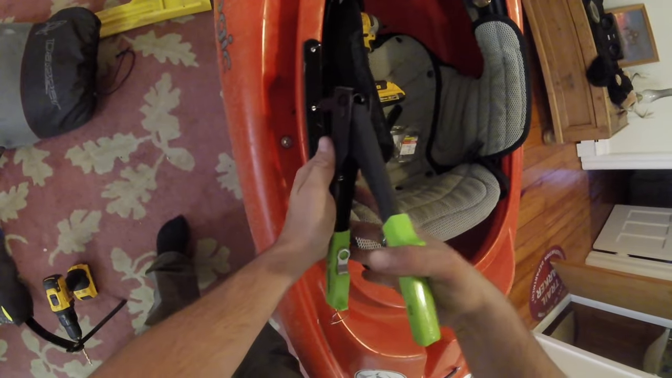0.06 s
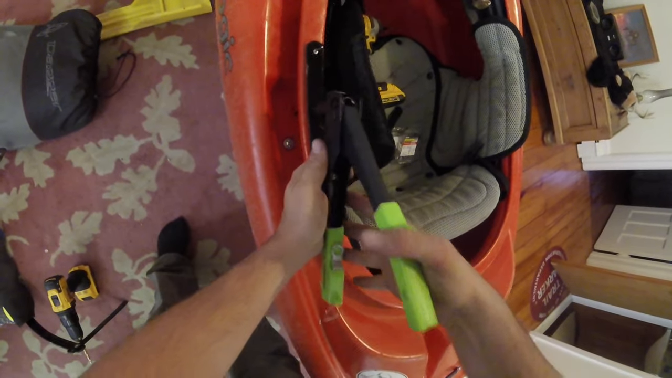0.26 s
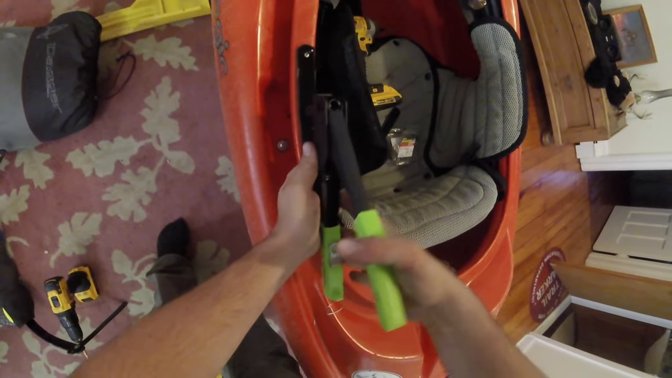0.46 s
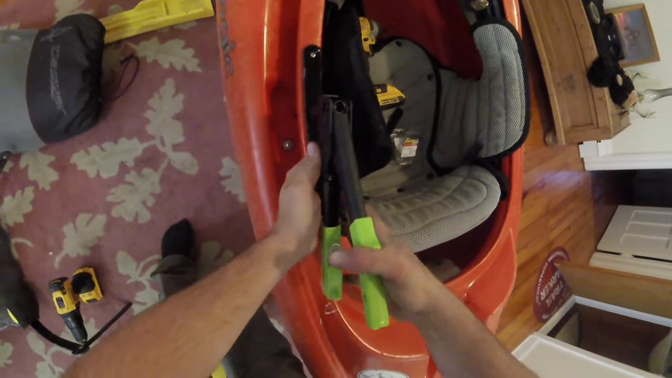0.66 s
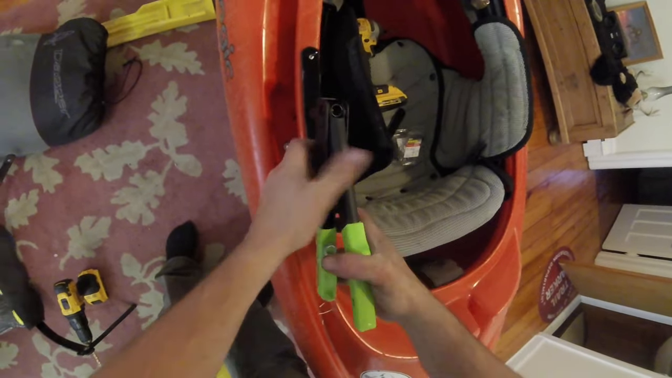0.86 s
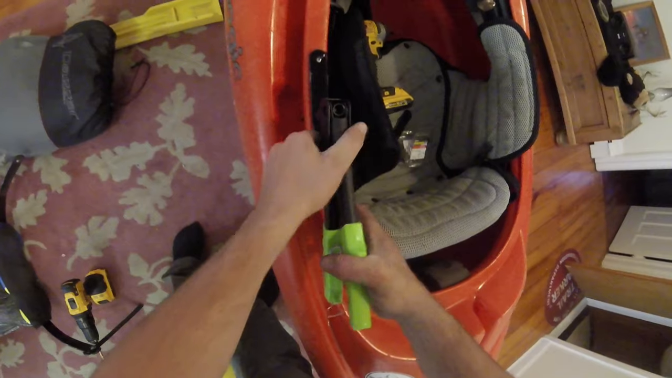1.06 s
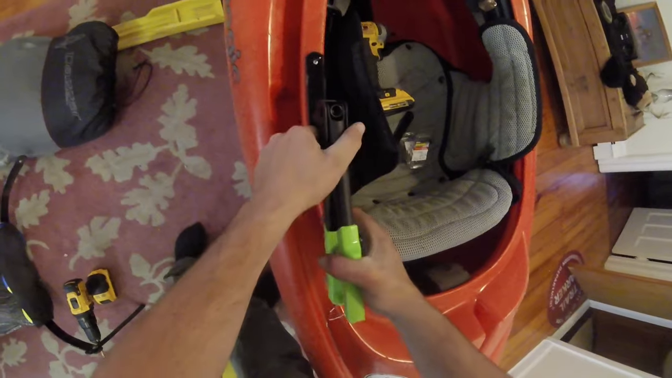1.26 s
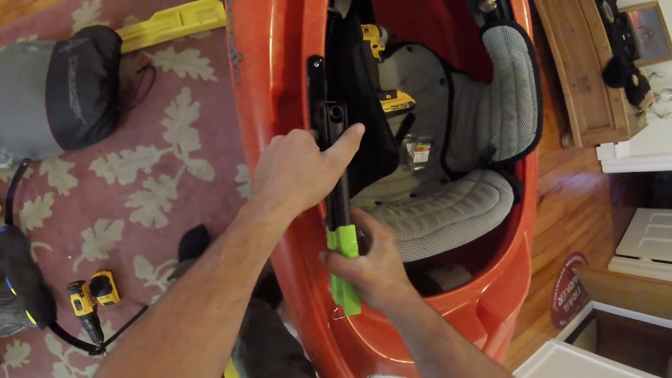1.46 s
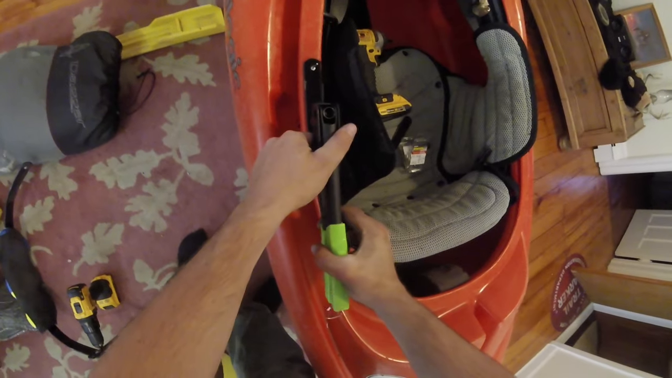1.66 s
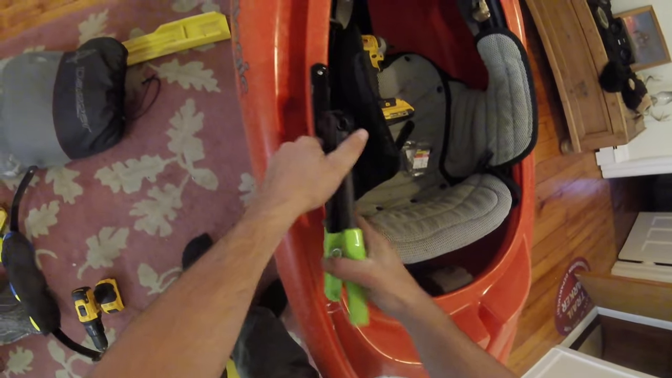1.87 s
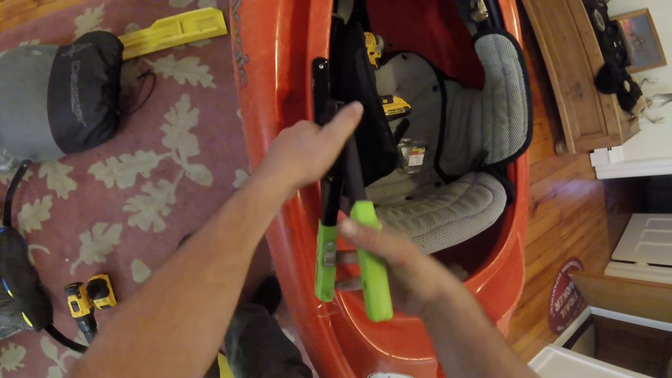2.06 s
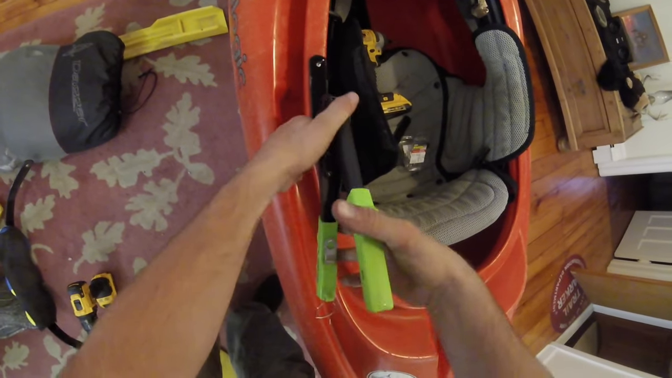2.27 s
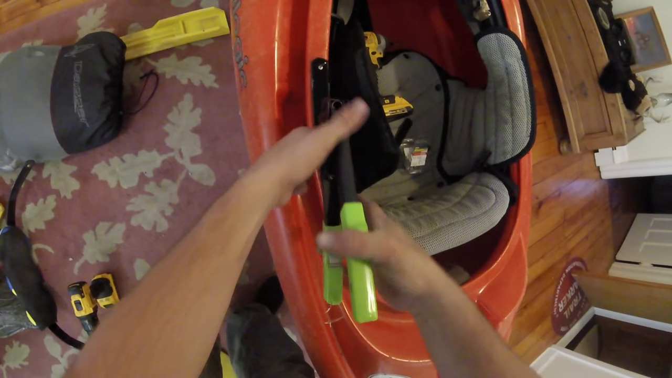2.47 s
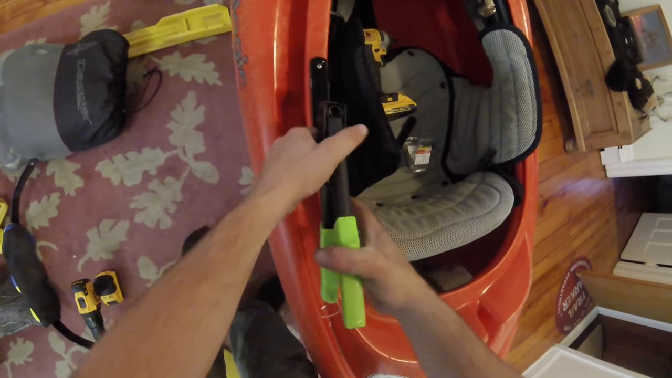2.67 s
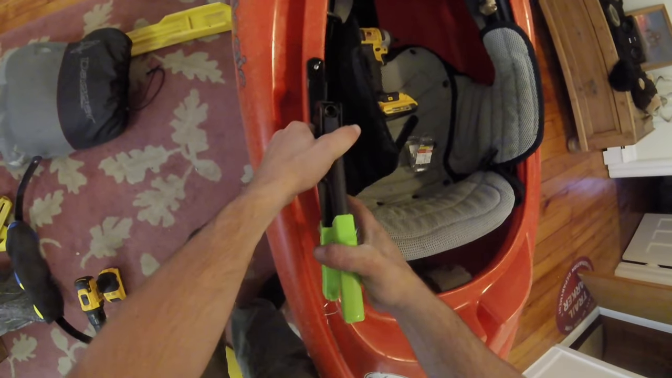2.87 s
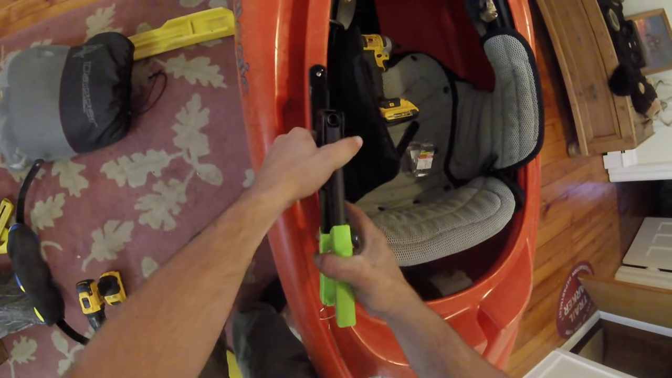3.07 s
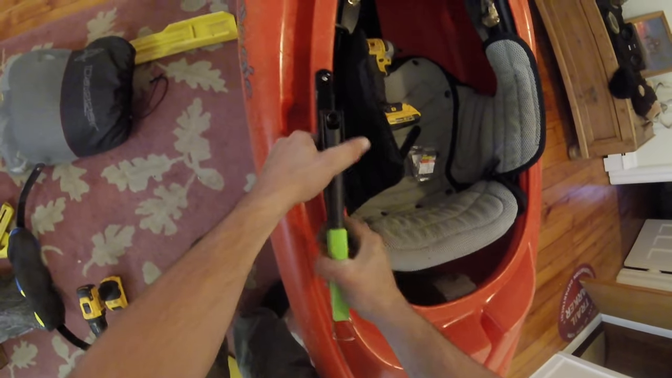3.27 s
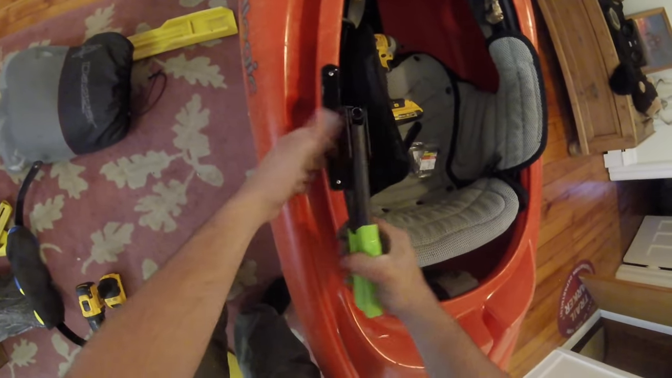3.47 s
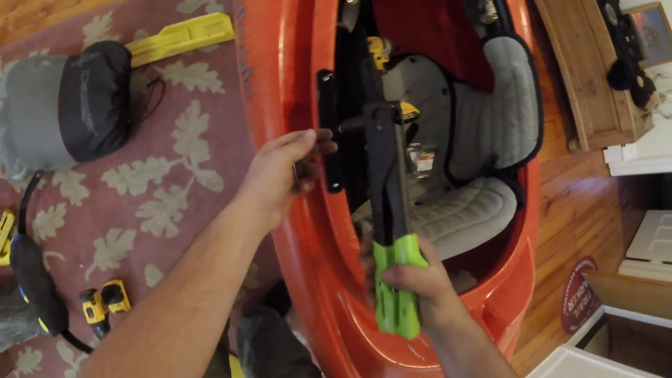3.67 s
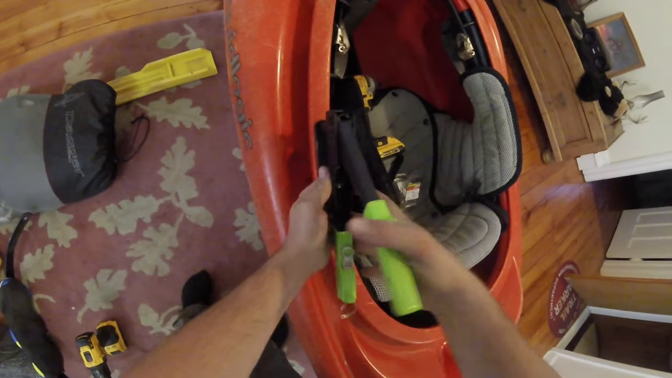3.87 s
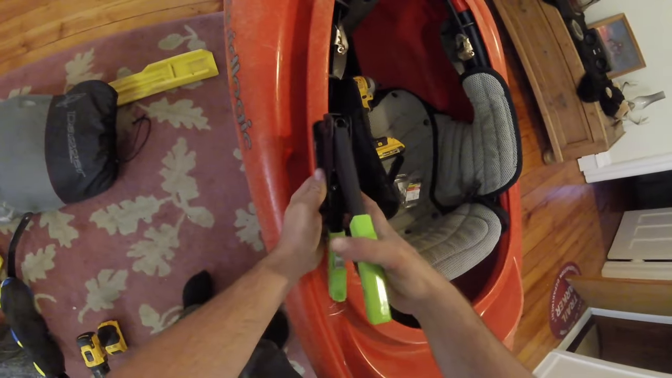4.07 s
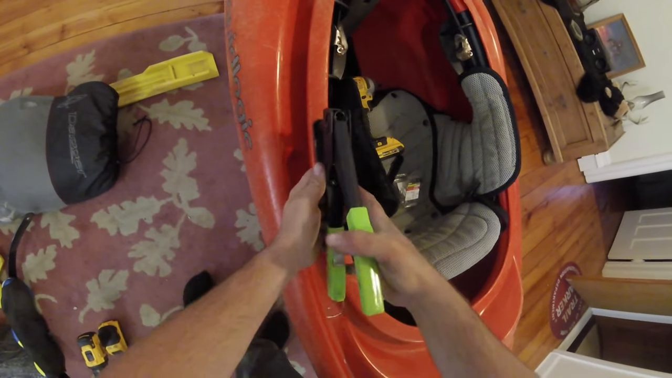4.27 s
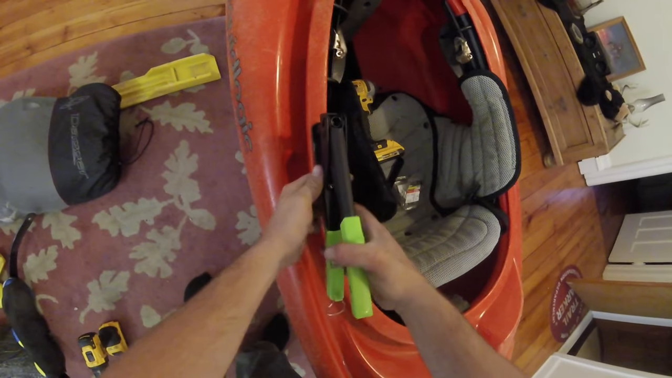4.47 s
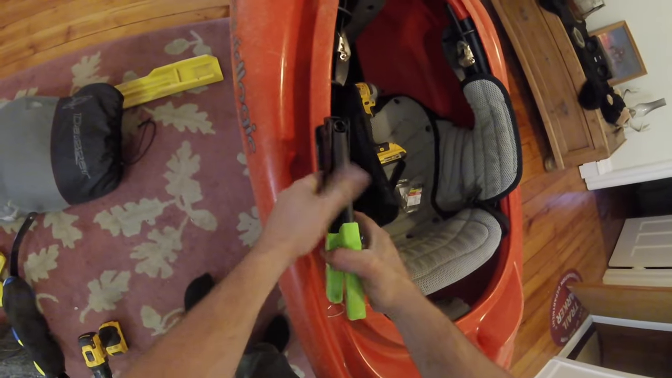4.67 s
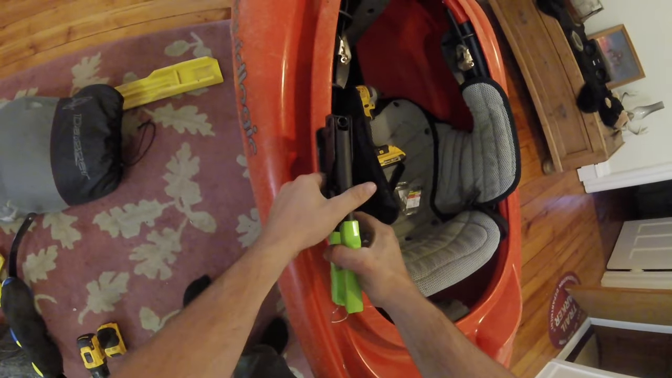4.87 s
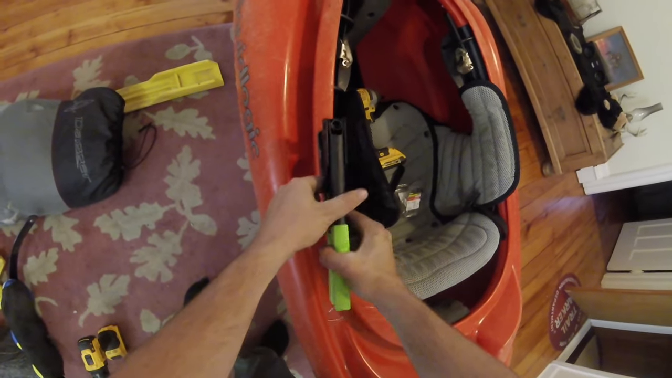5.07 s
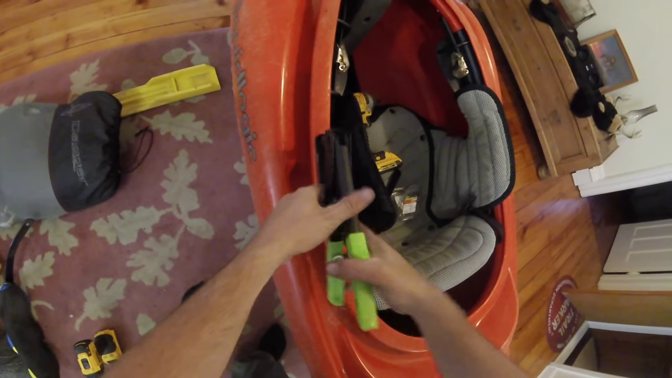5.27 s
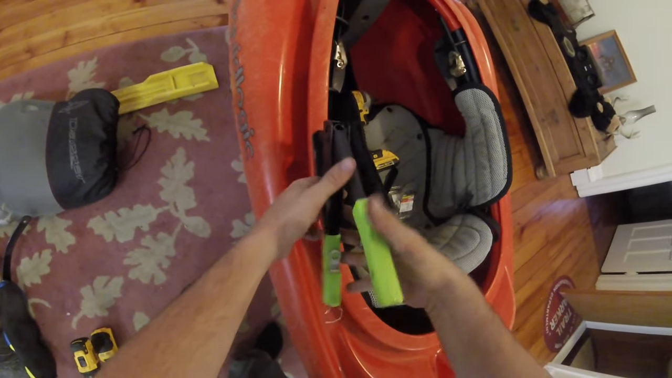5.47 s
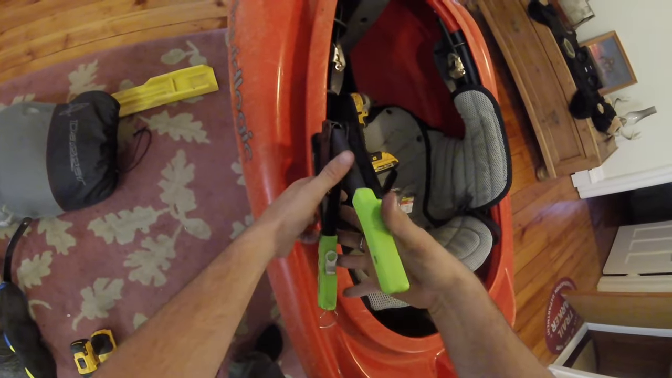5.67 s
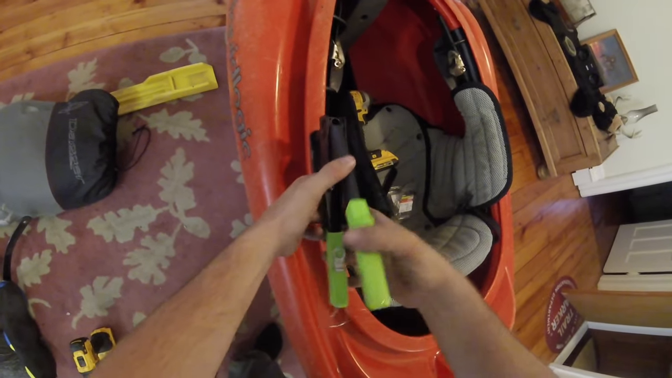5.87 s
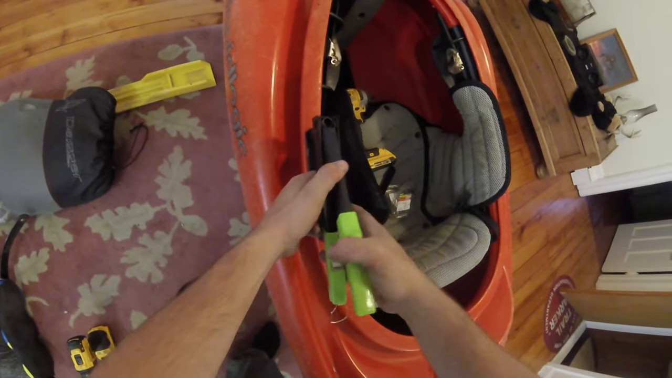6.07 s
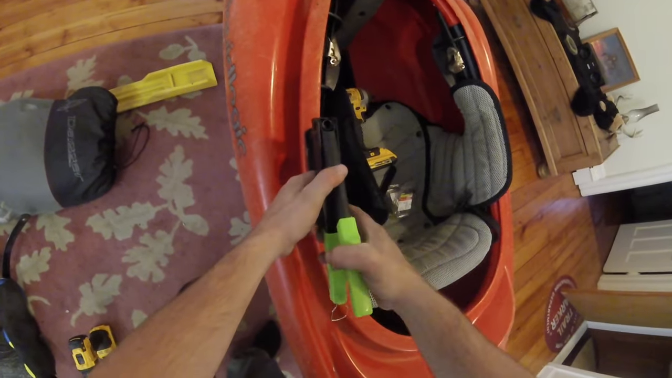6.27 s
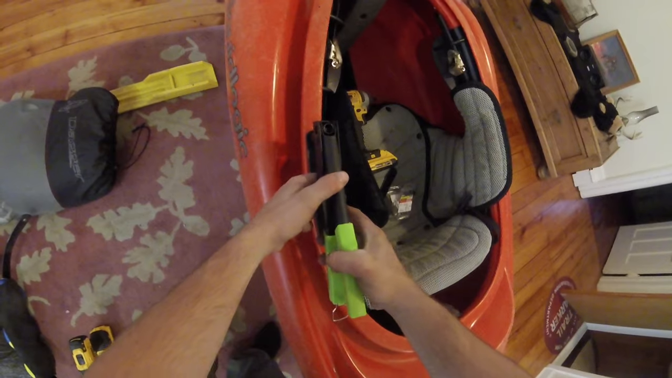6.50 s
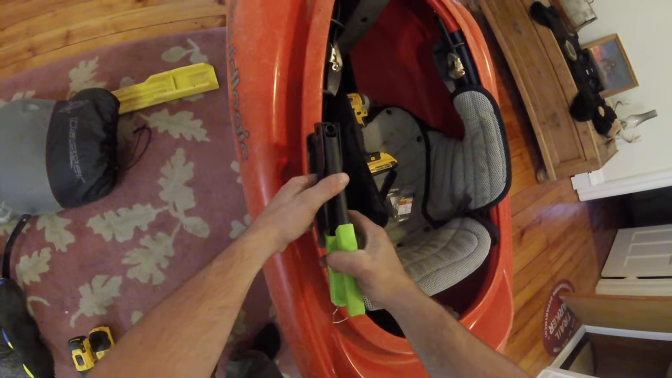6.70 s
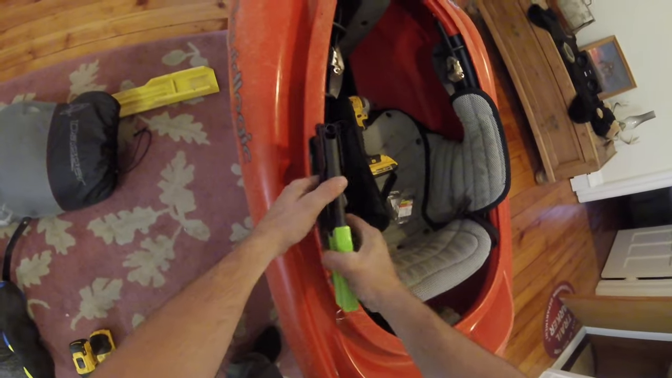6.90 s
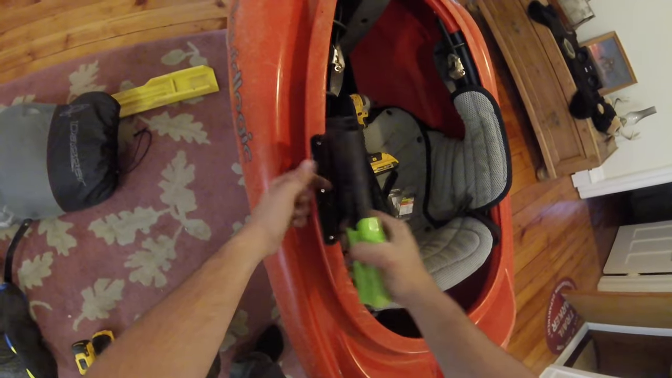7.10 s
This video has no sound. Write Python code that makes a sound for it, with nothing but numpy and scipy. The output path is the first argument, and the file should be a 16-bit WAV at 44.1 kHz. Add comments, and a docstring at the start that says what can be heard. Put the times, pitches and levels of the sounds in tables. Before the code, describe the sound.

A hand riveter clacks and thuds against a hollow plastic kayak hull, with two violent metallic snaps among quiet handling and low rumble.

```python
"""Hand riveter on a plastic kayak

A hand riveter is pumped against the hull of a plastic kayak in a carpeted room: handles and jaws clack
as filtered bursts and ringing modes, and the hollow hull booms as a bank of low modes under each contact.
Twice the steel mandrel breaks with a sharp snap: cracks, ringing jaws and a wash of diffuse echoes.
Shaped noise makes the head-worn camera's rumble and hiss; its limiter ducks everything around the snaps."""
import sys
import numpy as np
from scipy import signal
from scipy.fft import rfft, irfft
from scipy.io import wavfile
from scipy.ndimage import uniform_filter1d, minimum_filter1d

SR = 44100
rng = np.random.default_rng(int(sys.argv[2]) if len(sys.argv) > 2 else 0)


def digitize_waveform(pressure):
    """Quantize a signal to 16-bit integers and store it at the path in sys.argv[1].

    Rows of a 2-D input are taken as channels; values are limited to [-1, 1].
    """
    field = np.atleast_2d(pressure).T
    bounded = np.clip(field, -1, 1)
    quanta = np.round(bounded * 32767).astype(np.int16)
    wavfile.write(sys.argv[1], SR, quanta)


N = 314874
TIME = np.arange(N) / SR
HALF_SECOND = TIME[:SR // 2]
ROOM_T60_S, FIRST_ECHO_S = 0.4, 0.0032

# The mandrel breaks. Each row: moment in seconds, level in dB, delay of the jaws' recoil in seconds,
# recoil in dB relative to the break, pitch ratio of the jaws, force of the recoil on the hull in dB.
MANDREL_BREAKS = [(3.2198, -1.1, .0075, -4.5, .965, -6), (6.858, -1, .005, -8.5, 1.024, -7)]


def from_db(db):
    """Turn decibels into an amplitude factor."""
    return 10 ** (np.asarray(db) / 20)


def rms_one(x):
    """Scale a steady sound to rms 1."""
    return x / np.sqrt(np.mean(x ** 2) + 1e-20)


def loudest_one(x):
    """Scale a blow so that its loudest hundredth of a second has rms 1."""
    power = uniform_filter1d(x ** 2, SR // 100, mode="constant")
    return x / np.sqrt(power.max())


def level(curve):
    """Gain in time from rows of seconds and dB."""
    return from_db(np.interp(TIME, *np.transpose(curve)))


def at_hz(points, hz):
    """Read a spectrum on a log-frequency axis; above its last point it falls 10 dB per octave."""
    known_hz, db = np.transpose(points)
    octaves_beyond = np.log2(np.maximum(hz / known_hz[-1], 1))
    return np.interp(np.log(hz + 1e-9), np.log(known_hz), db) - 10 * octaves_beyond


def colour(x, spectrum):
    """Causal (minimum-phase) filter with the given spectrum, made by folding its cepstrum."""
    size = min(len(x), SR // 2) // 2 * 2
    hz = np.linspace(0, SR / 2, size // 2 + 1)
    cepstrum = irfft(np.log(from_db(at_hz(spectrum, hz))))
    cepstrum[1:size // 2] *= 2
    response = irfft(np.exp(rfft(cepstrum[:size // 2], size)))
    return signal.oaconvolve(x, response[:size // 2])[:len(x)]


def noise(spectrum):
    """Coloured noise of rms 1."""
    return rms_one(colour(rng.standard_normal(N), spectrum))


def fade(t, t60):
    """Exponential decay that loses 60 dB in t60 seconds."""
    return np.exp(-np.log(1000) * t / t60)


def ring(t, hz, db, t60):
    """One struck mode: a sine that dies away."""
    return from_db(db) * np.sin(2 * np.pi * hz * t) * fade(t, t60)


def add(track, s, sound):
    """Mix a sound into a track at s seconds."""
    start = round(s * SR)
    track[start:start + len(sound)] += sound[:N - start]


def struck(modes, spread_db, swell_s):
    """A body takes a moment to swell, and each blow weights its modes anew."""
    t = HALF_SECOND
    sound = np.zeros(len(t))
    for k, (hz, db, t60) in enumerate(modes):
        weight_db = db + spread_db * rng.standard_normal()
        sound += (-1) ** k * ring(t, hz, weight_db, t60)  # neighbours swing in opposite phase
    return loudest_one(sound * (1 - np.exp(-t / swell_s)))


def diffuse(t60):
    """Countless reflections that set in after the first echo and die away; unit energy."""
    t = HALF_SECOND
    onset = np.clip(t / FIRST_ECHO_S - 1, 0, 1)
    tail = rng.standard_normal(len(t)) * fade(t, t60) * onset
    return tail / np.linalg.norm(tail)


def impact(t60):
    """A short, nearly colourless excitation of unit energy."""
    t = HALF_SECOND
    grains = rfft(rng.standard_normal(len(t)) * fade(t, t60))
    flat = irfft(grains / np.abs(grains), len(t))  # keep the phases, level the spectrum
    even = flat * np.minimum(1, 2 * fade(t, t60))
    return even / np.linalg.norm(even)


def blow(spectrum, t60, room_db):
    """A blow on a part with many dense, quickly dying modes, and the room's smooth answer."""
    direct_and_room = impact(t60) + from_db(room_db) * diffuse(ROOM_T60_S)
    return loudest_one(colour(direct_and_room, spectrum))


def camera():
    """The head-worn camera: low noise rumbles with a changing level over a steady coloured hiss."""
    # Each row: time in seconds, rumble level in dB.
    rumbling = [(0, -49), (3.1, -48), (3.8, -47), (3.95, -35.5), (4.7, -43), (5.2, -37.5), (6.2, -39.5),
                (7.14, -42.5)]
    # Spectrum shapes. Each row: frequency in Hz, relative level in dB per Hz.
    rumble_spectrum = [(12, -6), (22, -2), (32, 0.5), (45, -7), (62, -9.5), (90, -19), (200, -30.5),
                       (600, -96)]
    hiss_spectrum = [(30, 25), (200, 5.5), (500, 4.5), (1000, 2), (2000, 0), (3000, -3.5), (4300, -14),
                     (5900, -5), (6550, 7.5), (7400, -0.5), (9000, -3), (10500, -11.5), (12500, -6.5),
                     (14500, -29)]
    hiss_db = -56.5
    return level(rumbling) * noise(rumble_spectrum) + from_db(hiss_db) * noise(hiss_spectrum)


def friction(spectrum, slips_per_s, spread_db):
    """Tiny slips of uneven size come at random; rms 1."""
    slips = (rng.random(N) < slips_per_s / SR) * rng.standard_normal(N)
    uneven = slips * from_db(spread_db * rng.standard_normal(N))
    return rms_one(colour(uneven, spectrum))


def handling():
    """Hands rub on the hull and swish as they slide; the tool scrapes in short swells as it shifts."""
    # The tool shifts on the hull. Each row: start in seconds, end in seconds, level at mid-swell in dB.
    scrapes = [(0.156, 0.226, -49.5), (0.27, 0.393, -39.5), (1.883, 2.076, -49), (3.468, 3.63, -51),
               (3.86, 3.97, -41), (4.15, 4.262, -55), (5.274, 5.427, -43)]
    # A hand slides to a new grip. Each row: fastest moment in seconds, duration in seconds
    # (between the points at 1/e of the peak), peak level of the swish in dB.
    slides = [(0.183, 0.05, -53), (0.995, 0.29, -64.5), (2.52, 0.45, -55.5), (3.85, 0.45, -59.5)]
    # Hands lean and rub on the hull. Each row: time in seconds, level in dB before the rub trim.
    rub_curve = [(0.0, -47.5), (0.18, -45.5), (0.34, -47), (1.05, -53.5), (1.75, -59), (1.95, -51),
                 (3.04, -58.5), (3.88, -58.5), (4.08, -48.5), (4.49, -56.5), (4.93, -62), (5.45, -50.5),
                 (6.38, -61.5), (6.96, -57.5), (7.14, -64)]
    # Spectrum shapes of tool on hull, skin on plastic and hull murmur.
    # Each row: frequency in Hz, relative level in dB per Hz.
    scrape_spectrum = [(100, -4), (300, 13), (650, 2.5), (1000, 4.5), (1800, -9.5), (2600, -10),
                       (4000, -28), (5500, -14), (10000, -42)]
    swish_spectrum = [(300, 5), (1200, -0.5), (2500, -1), (4000, -8.5), (5300, -1), (6800, 3), (8000, -7),
                      (12000, -26)]
    rub_spectrum = [(50, -25), (80, 1), (110, 3), (155, -2.5), (190, -5), (260, -3.5), (400, -11.5),
                    (700, -20), (2000, -30), (4000, -35.5)]
    rub_trim_db = -1.5
    slide_rub_db = 10  # hull murmur under a sliding hand, relative to its swish

    shifting = np.zeros(N)
    for start, end, db in scrapes:
        progress = np.clip((TIME - start) / (end - start), 0, 1)
        shifting += from_db(db) * np.sin(np.pi * progress) ** 2
    sliding = np.zeros(N)
    for s, duration, db in slides:
        sliding += from_db(db) * np.exp(-(2 * (TIME - s) / duration) ** 2)
    rubbing = np.hypot(from_db(rub_trim_db) * level(rub_curve), from_db(slide_rub_db) * sliding)

    scrape = shifting * friction(scrape_spectrum, slips_per_s=1500, spread_db=2.5)
    swish = sliding * friction(swish_spectrum, slips_per_s=7700, spread_db=0.5)
    rub = rubbing * friction(rub_spectrum, slips_per_s=5000, spread_db=1.5)
    return scrape + swish + rub


def clack(pitch):
    """The handles knock and ring briefly; the grip shifts their pitch."""
    # The knock's spectrum shape at pitch 1. Each row: frequency in Hz, relative level in dB per Hz.
    clack_spectrum = [(400, -13), (770, -11), (1020, -2.5), (1300, -0.5), (1620, -2), (2000, -10.5),
                      (2500, -12), (3400, -18), (5000, -39)]
    # The handles' ring at pitch 1. Each row: frequency in Hz, relative level in dB, t60 in seconds.
    handle_modes = [(1028, 0.5, 0.047), (1150, -9.5, 0.031), (1319, 1, 0.056), (1596, -4, 0.048),
                    (1790, -4, 0.034), (2180, -10.5, 0.032), (2410, -10, 0.037)]
    handle_ring_db = -3  # relative to the knock
    modes = [(hz * pitch, db, t60) for hz, db, t60 in handle_modes]
    knock = blow([(hz * pitch, db) for hz, db in clack_spectrum], t60=0.027, room_db=-6)
    return knock + from_db(handle_ring_db) * struck(modes, spread_db=2.0, swell_s=0.00071)


def fiddling():
    """The handles knock in their slack, loose links chime, and a rivet's tip hunts for its hole."""
    # The handles knock in the slack of their pivot. Each row: time in seconds, level in dB, pitch ratio.
    slack_knocks = [(.343, -27, .83), (.183, -49, .9), (1.956, -40, 1.2), (3.888, -46, .78),
                    (3.899, -48, .75), (3.95, -42, .75), (4.162, -53, 1.3), (5.296, -46, 1.2),
                    (5.593, -48.5, 1.22)]
    # Loose links of the riveter chime. Each row: time in seconds, frequency in Hz, starting level in dB.
    link_chimes = [(.543, 1580, -44), (.66, 1610, -50), (1.719, 1900, -44), (4.162, 4020, -48.5),
                   (4.62, 1620, -53.5), (5.593, 1750, -49)]
    # The tip of a fresh rivet taps around its hole. Each row: time in seconds, level in dB.
    rivet_taps = [(3.557, -43), (3.611, -38.5), (3.699, -36), (3.713, -37.5), (3.888, -40), (3.9415, -25),
                  (3.9494, -24)]
    # A dull tap on the plastic wall. Each row: frequency in Hz, relative level in dB per Hz.
    tap_spectrum = [(70, -12), (130, 12.5), (300, 10), (550, -3.5), (950, -3.5), (1350, -17), (1900, -34)]
    out = np.zeros(N)
    for s, db, pitch in slack_knocks:
        add(out, s, from_db(db) * clack(pitch))
    for s, hz, db in link_chimes:
        add(out, s, ring(TIME[:SR // 4], hz, db, t60=.048))
    for s, db in rivet_taps:
        add(out, s, from_db(db) * blow(tap_spectrum, t60=.025, room_db=-7.0))
    return out


def knocks():
    """Contacts tick in the steel, clack in the handles, thud in the wall and boom in the hull."""
    # The tool knocks on rivet and hull. Each row: time in seconds, force in dB, hardness from
    # 0 (plastic on plastic) to 1 (steel on steel), depth in dB (+ on the soft open wall, - on the stiff rim).
    contacts = [(.115, -43, .16, 0), (.183, -35, .43, -2.5), (.3426, -20.5, 0.75, -1.5),
                (.510, -42, .05, 7), (.544, -45.5, .53, 1), (.659, -42, .28, 6), (1.484, -64, .95, 4),
                (1.702, -40.5, .5, -4), (1.82, -44, 0.66, -2.5), (1.8965, -46, 0.9, -9),
                (1.905, -39.5, 0.71, 3), (1.918, -34, 0.66, -11.5), (1.9535, -34.5, 0.98, -5),
                (1.974, -32.5, 0.58, -11), (1.998, -40, 0.3, -8), (2.046, -44, 0.65, -9),
                (2.111, -59, .99, 2), (2.275, -50, 0.71, 0), (3.916, -50, 0.53, -3), (3.95, -28.5, .02, 0),
                (4.162, -39.5, .58, 1.5), (5.07, -38.5, 0.47, -1), (5.291, -38, .92, -5),
                (5.309, -35.5, .35, -11), (5.3405, -37, 0.78, 4), (5.354, -38.5, 0.76, -5),
                (5.375, -38, .52, -0.5), (5.592, -34.5, 0.39, 6.5), (5.865, -50, .1, -2),
                (5.94, -42, .05, 3.5)]
    # The hollow hull. Each row: frequency in Hz, relative level in dB at depth 0, t60 in seconds.
    hull_modes = [(82.8, -7, 0.29), (109.7, 1.5, .21), (127.1, -3.5, 0.26), (148.1, -6.5, .16),
                  (186.7, -3.5, .2), (242.4, 1, 0.13), (277, -9.5, 0.099), (304, -12, 0.092),
                  (364, -16, 0.18), (428, -20.5, 0.1), (503.8, -20, 0.17), (636, -23, .15)]
    # Spectrum shapes of steel and plastic wall. Each row: frequency in Hz, relative level in dB per Hz.
    tick_spectrum = [(600, -30.5), (1500, -3), (2400, -3), (3400, -9), (4200, -11), (5000, 0.5),
                     (6400, 4.5), (7600, -5.5), (10000, -16), (14000, -39)]
    thud_spectrum = [(70, -19.5), (135, -1), (190, 7.5), (260, 4), (380, -7.5), (520, -1), (720, -16.5),
                     (950, -16.5), (1300, -20.5), (2000, -37), (4000, -48.5)]
    # Each part's share of the force: dB at hardness 0, dB gained at hardness 1; harder is brighter.
    shares = (6.5, -6.5), (-6.5, 6), (-27, 21.5), (-38, 34)  # boom, thud, clack, tick
    deep_hz = 160  # depth lifts or lowers the hull modes below this pitch
    thud_loss = 1.2  # dB of thud lost per dB of positive depth
    kick_lag_s, kick_hardness = .0025, .56  # the recoil drives the tool into the hull

    kicks = [(s + recoil_s + kick_lag_s, kick_db, kick_hardness, 0)
             for s, _, recoil_s, _, _, kick_db in MANDREL_BREAKS]
    out = np.zeros(N)
    for s, force_db, hardness, depth_db in list(contacts) + kicks:
        boom_db, thud_db, clack_db, tick_db = (
            force_db + soft_db + gained_db * hardness for soft_db, gained_db in shares)
        thud_db -= thud_loss * max(depth_db, 0)
        hull = [(hz, db + depth_db * (hz < deep_hz), t60) for hz, db, t60 in hull_modes]
        add(out, s, from_db(tick_db) * blow(tick_spectrum, t60=0.012, room_db=-13.0))
        add(out, s, from_db(clack_db) * clack(1))
        add(out, s, from_db(thud_db) * blow(thud_spectrum, t60=0.063, room_db=-4))
        add(out, s, from_db(boom_db) * struck(hull, spread_db=2.0, swell_s=.02))
    return out


def snaps(crack_db, scatter_db, room_db):
    """Mandrel tears and parts, jaws recoil and bounce: four ringing cracks, then a wash of echoes."""
    # The steel jaws at pitch 1. Each row: frequency in Hz, relative level in dB, t60 in seconds.
    jaw_modes = [(4920, -7, 0.0035), (5800, 0.5, 0.0082), (6290, 1, 0.008)]
    # The mandrel's crack. Each row: frequency in Hz, relative level in dB per Hz.
    crack_spectrum = [(150, -12), (400, 1), (730, -15), (1050, 1.5), (1400, 2.5), (2000, -3.5), (3400, -6),
                      (4000, -9.5), (5000, -1), (6700, 2.5), (7600, -12.5), (10000, -24), (13000, -44)]
    # What the room returns of a snap. Each row: frequency in Hz, relative level in dB.
    echo_spectrum = [(480, 6), (700, 0), (2000, 0.5), (2900, -3), (3450, 0), (3900, -12.5), (5100, -6),
                     (5750, 1.5), (6600, -0.5), (7100, -11.5), (10500, -33)]
    tear_lead_s, tear_db = .0015, 0  # the steel starts to tear just before it parts
    bounce_s, bounce_db = .0023, -11  # the jaws bounce once after the recoil; dB relative to the break
    cockpit_t60_s = .14  # a snap scatters briefly inside the cockpit

    out = np.zeros(N)
    for s, db, recoil_s, recoil_db, pitch, _ in MANDREL_BREAKS:
        ringing = sum(ring(HALF_SECOND, hz * pitch, mode_db, t60) for hz, mode_db, t60 in jaw_modes)
        jaws = loudest_one(colour(ringing, crack_spectrum))
        tear, parting = (-tear_lead_s, tear_db), (0, 0)
        recoil, bounce = (recoil_s, recoil_db), (recoil_s + bounce_s, bounce_db)
        for lag_s, part_db in (tear, parting, recoil, bounce):
            crack = loudest_one(colour(impact(t60=0.013), crack_spectrum))
            add(out, s + lag_s, from_db(db + part_db) * (jaws + from_db(crack_db) * crack))
        cockpit = loudest_one(colour(diffuse(cockpit_t60_s), crack_spectrum))
        room = loudest_one(colour(diffuse(ROOM_T60_S), echo_spectrum))
        add(out, s, from_db(db + scatter_db) * cockpit)
        add(out, s, from_db(db + room_db) * room)
    return out


def scene():
    """Riveting work over the camera's own rumble and hiss."""
    breaks = snaps(crack_db=-4.0, scatter_db=-12, room_db=-14)
    work = knocks() + breaks + fiddling() + handling()
    return (work + camera())[None]


def limiter(x, threshold_db, creep_db_per_s):
    """The gain drops ahead of a loud sound, creeps up while it is held, then lets go."""
    ahead, hold = round(.044 * SR), round(.69 * SR)  # look-ahead and hold, in samples
    level_db = 10 * np.log10(np.abs(uniform_filter1d(x ** 2, SR // 100)) + 1e-12)
    excess_db = np.pad(level_db[ahead:], (0, ahead), mode="edge") - threshold_db
    creep_db = creep_db_per_s * TIME
    # running maximum over the hold time just past
    peak_db = -minimum_filter1d(-(excess_db + creep_db), hold, origin=(hold - 1) // 2, mode="nearest")
    held_db = peak_db - creep_db
    return x * from_db(-uniform_filter1d(np.maximum(held_db, 0), SR // 250))


def hold_peaks(x, top):
    """A fast gain dip keeps the remaining peaks under the ceiling."""
    span = SR // 1500
    gain = minimum_filter1d(top / np.maximum(np.abs(x), top), 2 * span)
    return x * uniform_filter1d(gain, span)


def record(dry):
    """Slow limiter, fast limiter, then a steep low-pass cuts the top."""
    cutoff_hz = 14000
    ducked = limiter(dry[0], threshold_db=-11.5, creep_db_per_s=13)
    limited = hold_peaks(ducked, top=.79)
    low_pass = signal.ellip(8, .1, 80, cutoff_hz, fs=SR, output="sos")
    return signal.sosfilt(low_pass, limited)[None]


dry = scene()
out = record(dry)
digitize_waveform(out)
```